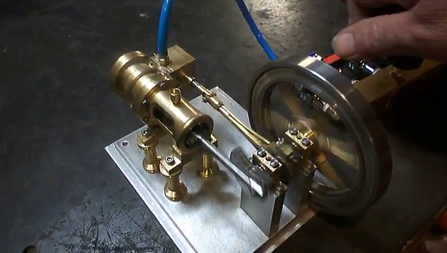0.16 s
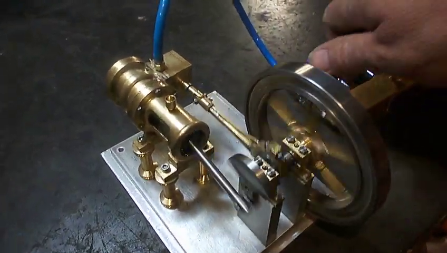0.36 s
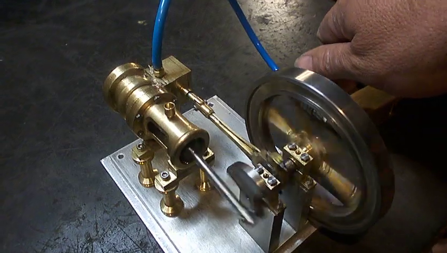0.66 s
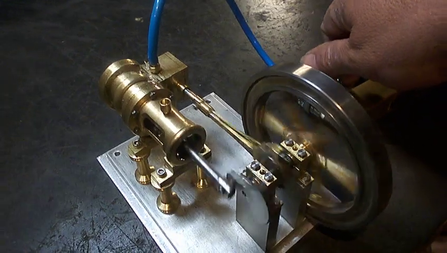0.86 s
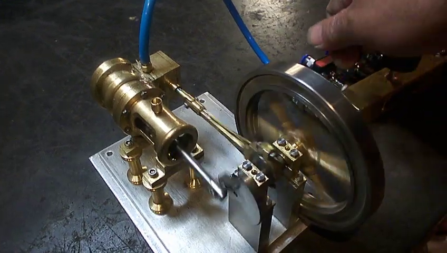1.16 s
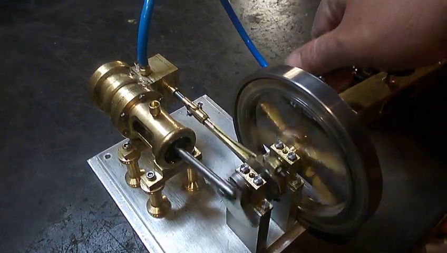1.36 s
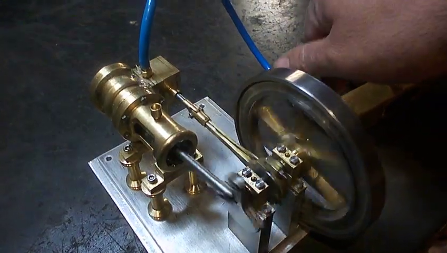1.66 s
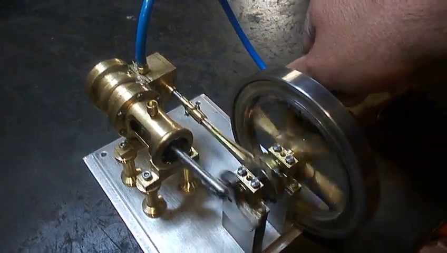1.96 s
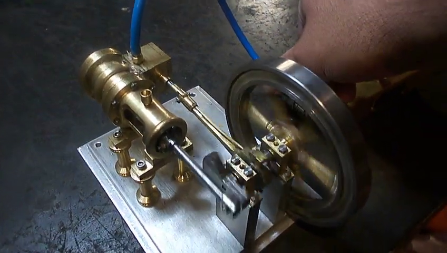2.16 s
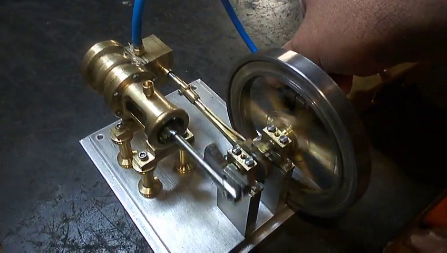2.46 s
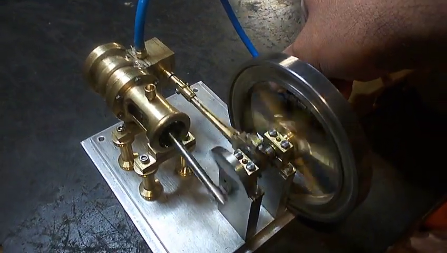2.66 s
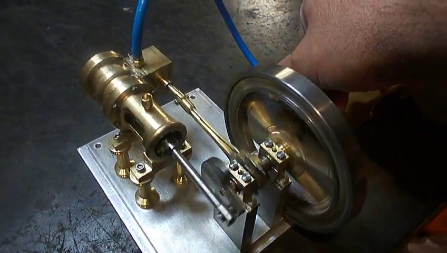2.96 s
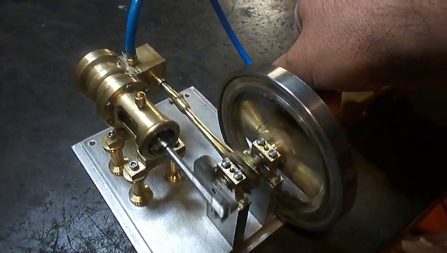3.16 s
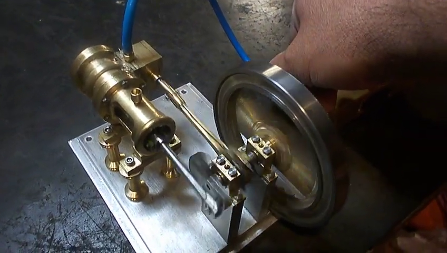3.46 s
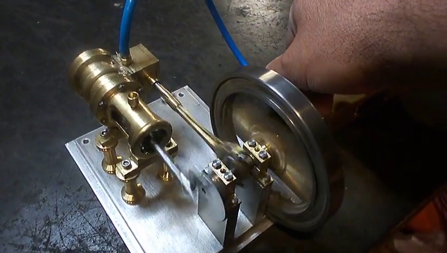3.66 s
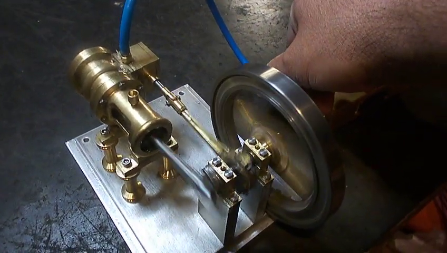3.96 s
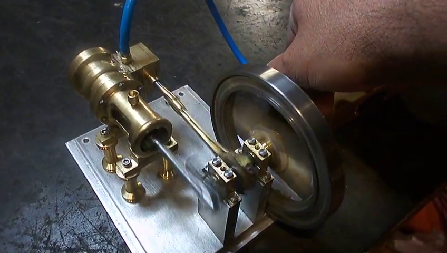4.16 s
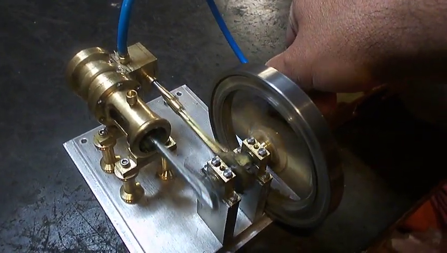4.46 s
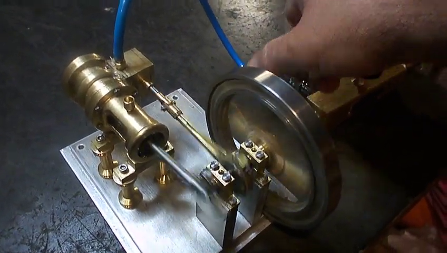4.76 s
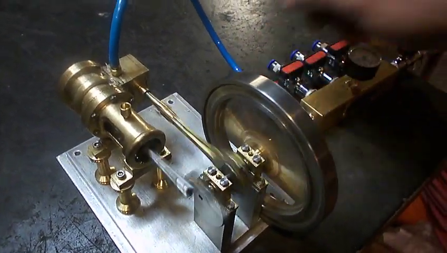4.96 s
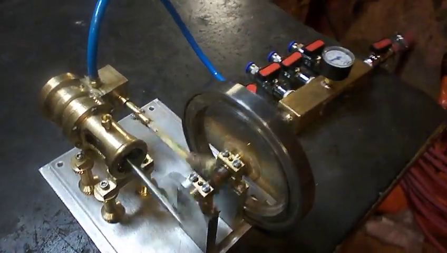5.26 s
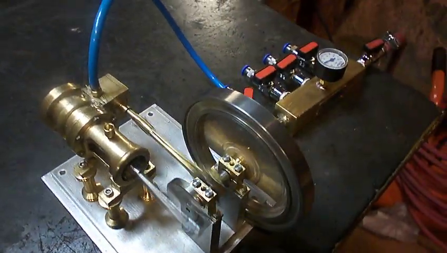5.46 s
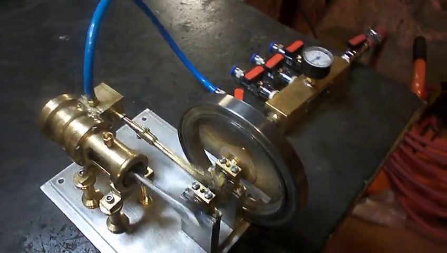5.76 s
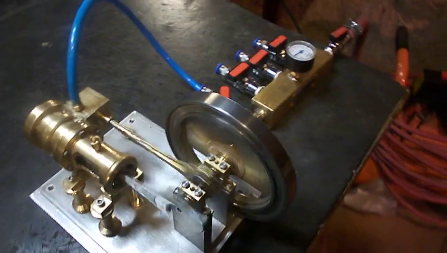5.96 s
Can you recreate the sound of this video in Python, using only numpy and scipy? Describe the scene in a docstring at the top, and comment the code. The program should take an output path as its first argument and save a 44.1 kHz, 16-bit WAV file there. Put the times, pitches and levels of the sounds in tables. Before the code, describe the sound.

From the start, a close, bright hiss of leaking air, strongest around four to seven kilohertz, runs without a break. Over it a small engine puffs twice per turn, about seven puffs a second, one duller and one brighter, each a soft-edged jet with a hollow, whistly port ring. Small dry clicks and knocks mark each turn, and short low moans slide under the hiss during the first second and a half. Around 2 s the jets grow stronger; from about 2.5 s the air supply is opened and the beat quickens, with a brief low moan near 2.8 s. The port ringing fades back as the rate climbs, passing sixteen puffs a second at 3.5 s and reaching twenty-two by 5 s. Low and middle knocks become a hard, dense, slightly uneven rattle, holding to the end at 6.1 s. Faint low workshop wash; close, mono, band-limited camera sound.

```python
"""Steady air hiss, puffs twice a turn and hard knocks quicken as a small brass engine on a steel bench speeds up.
It runs on compressed air, close to a camera microphone; midway the supply is opened: 3.5 to 11 turns a second.
Leak, exhaust jets, moans and low wash are shaped noise; the port rings as noise-fed resonances.
Slack joints knock the base at fixed crank angles: decaying sines."""
import sys
import numpy as np
from scipy import signal
from scipy.fft import rfft, irfft
from scipy.io import wavfile
from scipy.ndimage import uniform_filter1d

SR = 44100
rng = np.random.default_rng(int(sys.argv[2]) if len(sys.argv) > 2 else 0)


def inscribe(sig):
    """Save sig as 16-bit PCM at rate SR to the path in sys.argv[1].

    A 1-D sig is mono; a 2-D sig holds one channel per row.
    Samples are clipped to [-1, 1] before scaling.
    """
    pcm = np.round(np.clip(np.atleast_2d(sig).T, -1, 1) * 32767)
    wavfile.write(sys.argv[1], SR, pcm.astype(np.int16))


def invert_db(x):
    """Field ratio 10**(x/20) for x, a level in decibels (scalar or array-like)."""
    u = np.asarray(x, float) / 20
    return 10 ** u


N = 269892

# colour of the escaping air: (frequency [Hz], relative level per Hz [dB])
LEAK_COLOUR = [(400, -35), (620, -17), (870, -19), (1100, -17), (1750, -18), (2300, -9), (3300, -9),
               (4200, -4), (4650, -3.6), (4920, -4), (5080, -2.5), (5400, -2), (6350, -1.5), (6520, -2.5),
               (6800, 0), (7400, -8), (7700, -20), (8000, -33)]


def evened(x):
    """Scales to rms 1."""
    return x / np.sqrt(np.mean(x ** 2) + 1e-20)


def column(rows, index):
    """One column of a time table, interpolated at every sample."""
    times_s = [row[0] for row in rows]
    values = [row[index] for row in rows]
    return np.interp(np.arange(N) / SR, times_s, values)


def noise(colour, patchy_db, flicker_db, size=512):
    """Random short-time spectra with drifting patches and a flicker shared by all bins; rms 1."""
    frames, bin_hz = 4 * N // size + 5, np.fft.rfftfreq(size, 1 / SR)
    real, imag, patches = rng.standard_normal((frames, len(bin_hz), 3)).T
    patches = uniform_filter1d(patches, size=8, axis=0)  # across bins
    patches = evened(uniform_filter1d(patches, size=10, axis=1))  # across frames
    flicker = evened(uniform_filter1d(rng.standard_normal(frames), size=4))
    hz, db = np.transpose(colour)
    colour_db = np.interp(np.log(bin_hz + 1), np.log(hz), db)[:, None]
    level_db = colour_db + patchy_db * patches + flicker_db * flicker
    spectra = (real + 1j * imag) * invert_db(level_db)
    return evened(signal.istft(spectra, nperseg=size, noverlap=3 * size // 4)[1][:N])


def resonate(x, hz, width_hz):
    """Shifts hz (may glide) down to zero, smooths, shifts back: a resonance of gain 1."""
    carrier = np.exp(2j * np.pi * np.cumsum(hz * np.ones(len(x))) / SR)
    pole = np.exp(-np.pi * abs(width_hz) / SR)
    return 2 * (carrier * signal.lfilter([1 - pole], [1, -pole], x / carrier)).real


def resonant_band(x, hz, width_hz):
    """Two passes of one resonance, for steeper skirts; rms 1."""
    return evened(resonate(resonate(x, hz, width_hz), hz, width_hz))


def leak():
    """Air escaping past valve and piston all the time; its colour leans as the camera moves."""
    # air supply: (time [s], hiss level before the lean [dB], lean to the treble [dB])
    air_supply = [(0, -28.5, -5.5), (.2, -25.5, -3), (1.1, -27, -2), (2.1, -27.5, -3.5), (2.7, -26, -0.5),
                  (3.6, -26, -1.4), (4.35, -27, -1.5), (5.5, -27.5, -2.5), (6.12, -27, -2.9)]
    hiss = noise(LEAK_COLOUR, patchy_db=1.41, flicker_db=0.64)
    low = signal.sosfiltfilt(signal.butter(1, 4000, fs=SR, output="sos"), hiss)
    high = hiss - low
    lean_db = column(air_supply, index=2)
    return invert_db(column(air_supply, index=1)) * (invert_db(-lean_db) * low + invert_db(lean_db) * high)


def exhaust(turns, speed):
    """Each stroke opens the port for a fraction of a turn: a jet of hiss, and the passage rings with it."""
    # the two strokes: (crank angle [turns], lag [s], jet offset [dB], ring offset [dB], lean to upper peak [dB])
    strokes = [(.19, -0.0043, -0.5, -2.5, -8), (0.732, -0.00042, -0.9, 0.1, -3)]
    # strength of the exhaust: (time [s], jet level [dB], port ring level [dB])
    strength = [(0, -31.5, -34), (1.0, -29, -33.5), (1.9, -25, -35.5), (2.5, -27, -34),
                (2.75, -27.5, -43.5), (3.4, -28, -48), (4.2, -33.5, -43), (6.12, -31, -42)]
    # lower and upper peak of the jet: (frequency [Hz], width [Hz], level before the lean [dB])
    jet_peaks = [(4705, 470, 1.5), (6680, 890, 7)]
    # open exhaust passage; the lowest three near 2, 3 and 4 times 355 Hz:
    # (frequency [Hz], width of one pass [Hz], relative level [dB])
    port_modes = [(725, 68, 1.5), (1068, 130, 8), (1425, 130, 4), (2352, 150, 7.5), (3005, 120, 10),
                  (3720, 130, -2.5), (4670, 170, 10), (5040, 120, -0.5), (5600, 80, 5), (5600, 160, -8.5),
                  (6100, 170, -2), (7230, 130, 3.5)]
    open_turns = .27  # two standard deviations of the opening
    lean_apart_db = 4  # per doubling of speed the first stroke turns duller, the second brighter
    uneven_jet_db, uneven_ring_db, uneven_lean_db = .7, 1.0, 1.8
    ring_sharp = 1.16  # above 1 the ring is briefer than the jet

    jet_level_db, ring_level_db = column(strength, index=1), column(strength, index=2)
    out = np.zeros(N)
    for (angle, lag_s, jet_db, ring_db, lean_db), apart in zip(strokes, (-1, 1)):
        since = turns - angle - lag_s * speed + .5
        stroke_number = np.floor(since).astype(int) + 2
        jet_chance, ring_chance, lean_chance, detune = rng.standard_normal((60, 4))[stroke_number].T
        opening = np.exp(-.5 * ((since % 1 - .5) / (.5 * open_turns)) ** 2)

        hiss = noise(LEAK_COLOUR, patchy_db=1.5, flicker_db=.6)
        lean_db = lean_db + apart * lean_apart_db * np.log2(speed / speed[0]) + uneven_lean_db * lean_chance
        jet = hiss.copy()
        for (hz, width_hz, db), side in zip(jet_peaks, (-1, 1)):
            jet += invert_db(db + side * lean_db) * resonate(hiss, hz, width_hz)
        jet = jet / np.sqrt(uniform_filter1d(jet ** 2, size=8000) + 1e-12)  # the lean changes colour, not level

        air, tune = rng.standard_normal(N), 1 + 0.008 * detune  # the passage is never quite the same length
        ring = evened(sum(invert_db(db) * resonant_band(air, hz * tune, width_hz) for hz, width_hz, db in port_modes))

        out += opening * invert_db(jet_level_db + jet_db + uneven_jet_db * jet_chance) * jet
        out += opening ** ring_sharp * invert_db(ring_level_db + ring_db + uneven_ring_db * ring_chance) * ring
    return out


def knocks(turns, speed):
    """Crank, rod and valve knock the base every turn, level following speed, a little uneven in time and force."""
    # (crank angle [turns], frequency [Hz], t60 [s], level near 11 turns a second [dB], rise per doubling [dB])
    joints = [(.08, 313, .15, -46, 110), (.229, 511, .05, -42, 8), (.3, 90, .025, -57, 14),
              (.329, 275, .13, -40.5, 130), (.26, 1300, .012, -44, 8), (.471, 450, .019, -40, -1),
              (.481, 800, .018, -38, 10), (.552, 221, .17, -40, 90), (.5, 700, .03, -39, 6),
              (.836, 283, .075, -46.5, 60), (.874, 200, .09, -47, 10), (.935, 712, .04, -44, 20),
              (.96, 168, .06, -46, -8), (.93, 75, .02, -51, 5), (.44, 200, .06, -46, -8),
              (.63, 510, .026, -45, 4), (.25, 185, .05, -47, -2), (.75, 150, .07, -49, -8),
              (.8, 425, .024, -46, 2), (.53, 260, .04, -47, -12)]
    # the base (modes under base_hz) is shaken less until the flywheel passes shake_speed [turns/s]
    base_hz, shake_speed, calm_db = 500, 5.7, -26
    late_s, uneven_db = .0001, .8

    out, t = np.zeros(N), np.arange(8000) / SR
    for angle, hz, t60_s, db, rise_db in joints:
        at = np.flatnonzero(np.diff(np.floor(turns - angle)))
        late, force = rng.standard_normal((60, 2))[:len(at)].T
        base_db = calm_db * (hz < base_hz) / (1 + np.exp(speed[at] - shake_speed))
        knock_db = db + rise_db * np.log2(speed[at] / 11) + base_db + uneven_db * force
        train = np.zeros(N)
        train[np.clip(at + (late_s * SR * late).astype(int), 0, N - 1)] = invert_db(knock_db)
        onset = 1 - np.exp(-t * hz * 1.2)
        ring = invert_db(-60 * t / t60_s) * onset * np.sin(2 * np.pi * hz * t)
        out += signal.oaconvolve(train, ring / abs(ring).max())[:N]
    return out


def moans():
    """Short low moans under the hiss: narrow bands of noise that swell and slide."""
    # (start [s], length [s], peak rms [dB], width of one pass [Hz], first [Hz], middle [Hz], last frequency [Hz])
    slides = [(.1, 0.21, -47, 71, 370, 330, 290), (0.35, 0.56, -45, 150, 330, 440, 390),
              (1.124, .36, -45.5, 115, 350, 257, 430), (2.806, 0.21, -46, 23, 200, 190, 201),
              (2.76, .45, -57, 41, 137, 115, 120)]
    edge = 0.51  # small: abrupt swell, large: pointed
    out, t = np.zeros(N), np.arange(N) / SR
    for start_s, length_s, db, width_hz, *pitch_hz in slides:
        along = np.clip((t - start_s) / length_s, 0, 1)
        hz = np.interp(along, (0, .5, 1), pitch_hz)
        swell = np.abs(np.sin(np.pi * along)) ** edge * (along < 1)
        out += invert_db(db) * swell * resonant_band(rng.standard_normal(N), hz, width_hz)
    return out


def rumble():
    """Low wash of workshop and bench: coloured noise plus one resonant hump."""
    # colour of the wash: (frequency [Hz], relative level per Hz [dB])
    wash_colour = [(40, -44), (95, -35), (125, -10), (200, -2), (350, 0), (500, -1), (700, -10),
                   (1200, -30)]
    # (time [s], wash level [dB], hump level [dB])
    room_levels = [(0, -48.5, -55.5), (.7, -45, -54), (1.3, -48.5, -53), (2.1, -48, -58), (2.7, -50, -56.5),
                   (3.4, -48.5, -54), (4.2, -47.5, -60.5), (6.12, -50.5, -58.5)]
    hump = resonant_band(rng.standard_normal(N), hz=151, width_hz=60)
    wash = noise(wash_colour, patchy_db=0.8, flicker_db=0.1, size=2048)
    return invert_db(column(room_levels, index=1)) * wash + invert_db(column(room_levels, index=2)) * hump


def scene():
    """Engine and room, one channel."""
    # flywheel: (time [s], speed [turns/s])
    flywheel = [(0.0, 3.476), (1.2, 3.505), (2.45, 3.341), (2.75, 4.623), (3.05, 5.367), (3.5, 7.868),
                (4.0, 9.559), (4.7, 10.722), (5.4, 11.079), (6.12, 11.108)]
    start_turn = -.711
    speed = column(flywheel, index=1)
    turns = start_turn + np.cumsum(speed) / SR
    return (leak() + exhaust(turns, speed) + knocks(turns, speed) + moans() + rumble())[None]


def band_limit(x):
    """A steep low-pass at the top of the band."""
    return signal.sosfilt(signal.butter(12, 9080, fs=SR, output="sos"), x)


def record(dry):
    """Narrow notches and a bass cut, then sampling at a low rate leaves a faint mirror image above the fold."""
    # camera filters: (frequency [Hz], half width [Hz])
    notches = [(1303, 12), (3938, 17), (5219, 18), (5905, 14), (7862, 70), (7998, 12)]
    # mirror image: (frequency [Hz], gain [dB])
    mirror_gain = [(7998, -3), (8500, -13.5), (8800, -29.5), (9000, -34), (9200, -33), (9300, -109)]
    fold_hz, bass_cut_hz = 7998, 70

    spectrum, hz = rfft(dry[0]), np.fft.rfftfreq(N, 1 / SR)
    for notch_hz, half_hz in notches:
        spectrum = spectrum * (hz - notch_hz) / (hz - notch_hz - 1j * half_hz)
    spectrum = spectrum * (hz / bass_cut_hz) ** 2 / np.sqrt(1 + (hz / bass_cut_hz) ** 4)
    fold = np.searchsorted(hz, fold_hz)
    image_db = np.interp(hz[fold:2 * fold], *np.transpose(mirror_gain))
    image = np.conj(spectrum[fold - 1::-1]) * invert_db(image_db)
    spectrum = np.concatenate([spectrum[:fold], image, np.zeros(len(hz) - 2 * fold)])
    return band_limit(irfft(spectrum, N)[None])


dry = scene()
out = record(dry)
inscribe(out)
```